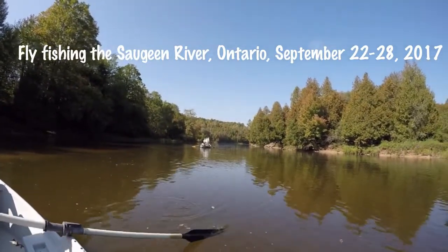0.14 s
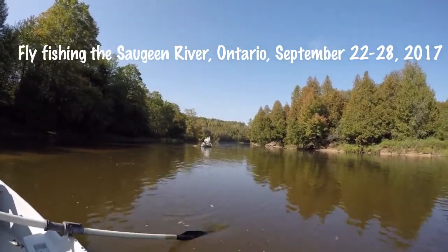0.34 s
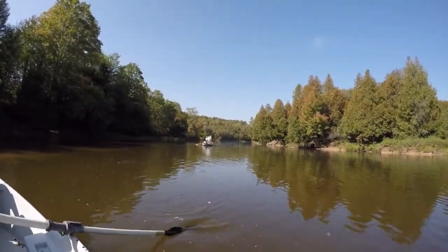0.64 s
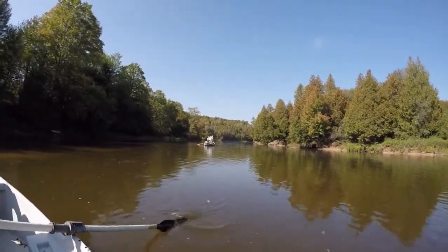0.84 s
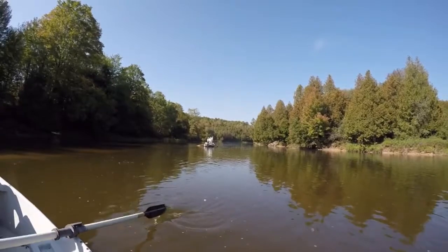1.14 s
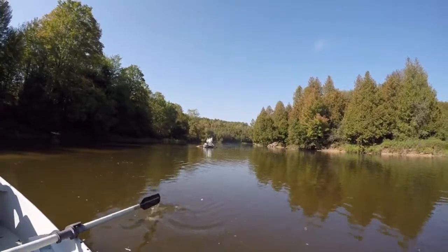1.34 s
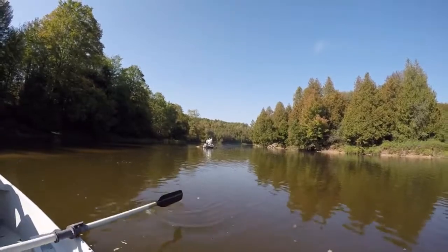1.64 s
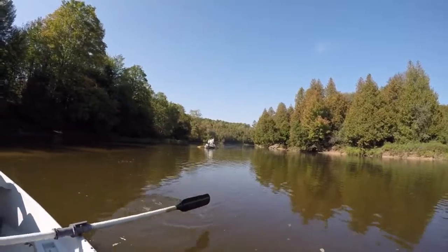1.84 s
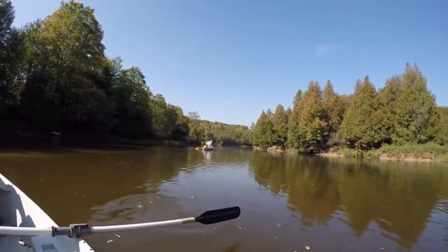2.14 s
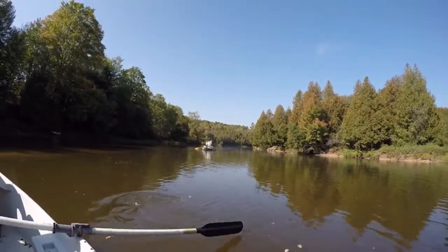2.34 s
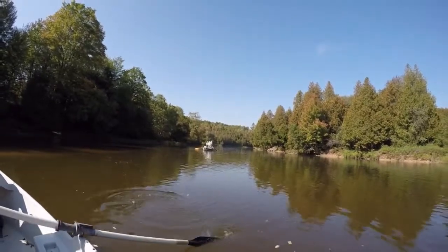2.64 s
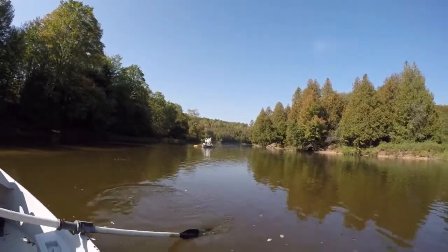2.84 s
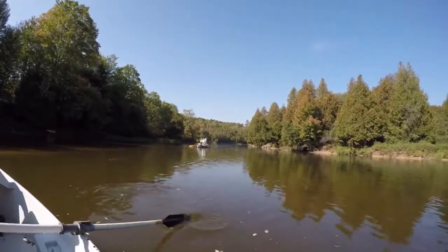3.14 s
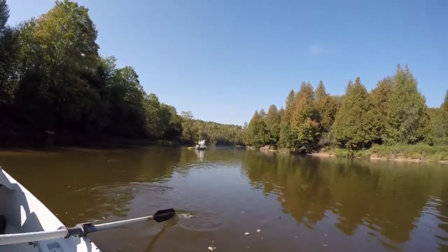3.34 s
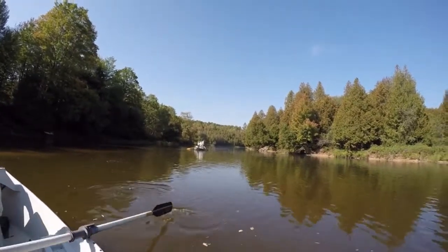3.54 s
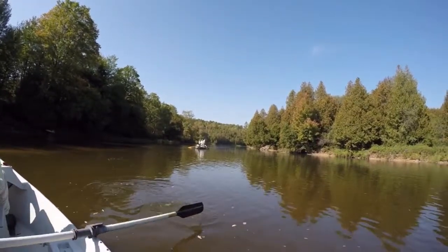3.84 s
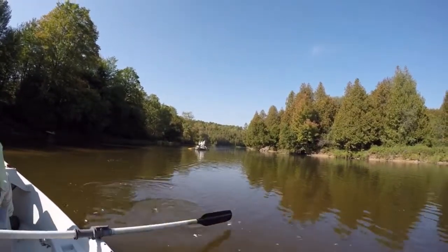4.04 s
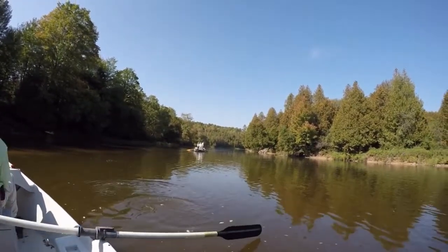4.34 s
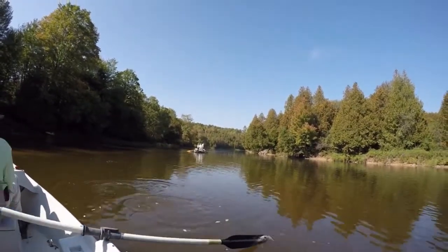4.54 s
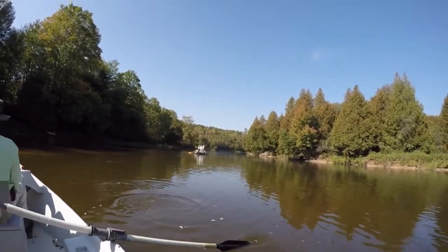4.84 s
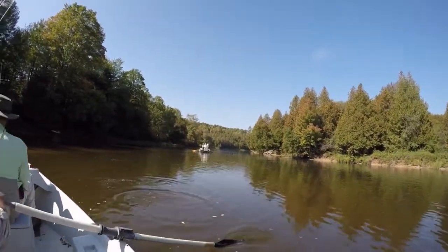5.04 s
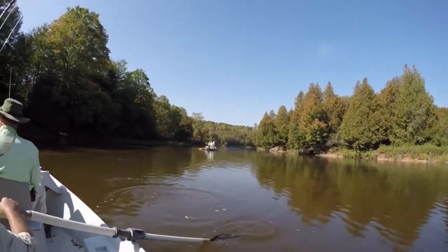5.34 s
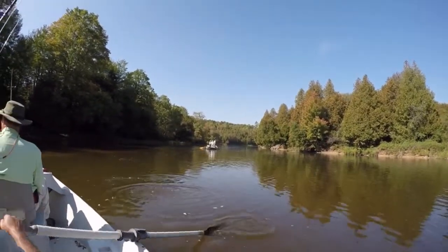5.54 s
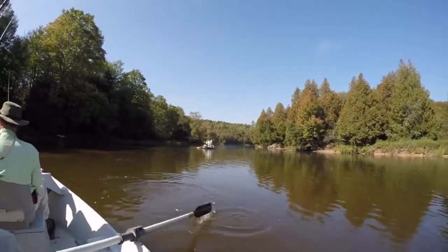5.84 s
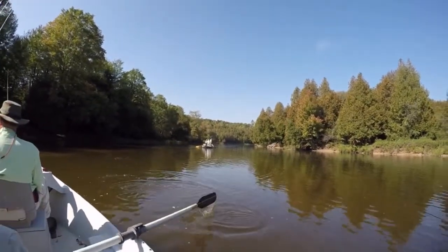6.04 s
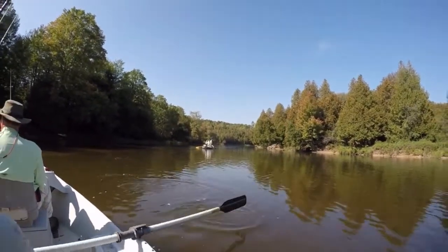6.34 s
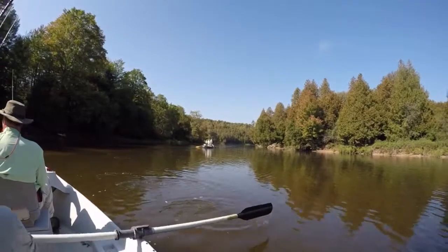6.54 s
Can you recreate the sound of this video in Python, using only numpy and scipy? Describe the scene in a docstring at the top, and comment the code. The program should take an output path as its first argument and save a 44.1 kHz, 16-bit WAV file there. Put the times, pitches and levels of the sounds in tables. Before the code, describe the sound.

Quiet rowing heard from on board: bright oarlock clicks, dripping and gurgling water, soft hull thumps, and a low rumble beneath.

```python
"""Rowing on a calm river

A boat is rowed gently, three strokes and a recovery, heard from on board. Oars click and knock in their
locks, and feet or oar handles thump the hull: each blow rings a set of decaying modes.
Blades stir up bubbles and shed drops, each a sine under a swelling and dying envelope.
A low rumble and a soft hiss, both shaped noise, lie under it all."""
import sys
import numpy as np
from scipy import signal
from scipy.fft import rfft, irfft
from scipy.io import wavfile
from scipy.ndimage import uniform_filter1d

SR = 44100
rng = np.random.default_rng(int(sys.argv[2]) if len(sys.argv) > 2 else 0)


def generate_wav(signal):
    """Clip the signal to [-1, 1] and save it as 16-bit WAV at the path in sys.argv[1]."""
    frames = np.transpose(np.atleast_2d(signal))
    scaled = np.clip(frames, -1, 1) * 32767
    pcm = np.round(scaled).astype(np.int16)
    wavfile.write(sys.argv[1], SR, pcm)


N = 295029  # length in samples


def undb(db):
    """Level law: decibels to amplitude gain."""
    return 10 ** (np.asarray(db) / 20)


def unit(x):
    """Power normalisation: scale to rms 1."""
    return x / np.sqrt(np.mean(x ** 2))


def curve(points):
    """Linear interpolation: (t, value) points joined by straight lines in time."""
    t, value = np.transpose(points)
    return np.interp(np.arange(N) / SR, t, value)


def add(out, s, sound):
    """Superposition: mix a sound in at time s."""
    i = int(np.clip(s * SR, 0, N - 1))
    out[i:i + len(sound)] += sound[:N - i]


def noise(spectrum):
    """Spectral shaping: white noise weighted by (f, level) points, rms 1."""
    hz, db = np.transpose(spectrum)
    f = np.maximum(np.fft.rfftfreq(N, 1 / SR), 1)
    gain = undb(np.interp(np.log(f), np.log(hz), db))
    return unit(irfft(rfft(rng.standard_normal(N)) * gain, N))


def band(hz, width_hz):
    """Resonance: noise concentrated round one frequency, rms 1."""
    f = np.fft.rfftfreq(N, 1 / SR)
    gain = 1 / (1 + (2 * (f - hz) / width_hz) ** 2)
    return unit(irfft(rfft(rng.standard_normal(N)) * gain, N))


def bubble(hz, swell_s, glide):
    """Bubble resonance: an air pocket swells, rings and dies, rising in pitch as it nears the surface."""
    age = np.arange(int(swell_s * SR * 7)) / (swell_s * SR)  # in swell times
    shape = (age * np.exp(1 - age)) ** 1.5  # greatest at age 1
    cycles = hz * swell_s * (age + glide * (age ** 2 / 2 - age))  # passes through hz at age 1
    return shape * np.sin(2 * np.pi * cycles)


def bubbles(pitch, spread, per_s, cycles, scatter_db):
    """Random superposition: many small bubbles scattered round a pitch that may move, rms 1."""
    out, pitch = np.zeros(N), np.broadcast_to(pitch, N)
    for when, up, down, size in rng.random((int(per_s * N / SR), 4)):
        detune = np.exp(spread * np.sqrt(6) * (up - down))  # spread is the standard deviation
        hz = np.clip(pitch[int(when * N)] * detune, 200, 14000)
        add(out, when * N / SR, undb(scatter_db * size) * bubble(hz, cycles / hz, glide=0.034))
    return unit(out)


def blows(table, modes, contact_s, crack, crack_s, crack_hz, detuning):
    """Modal synthesis: each blow rings the modes in its own mix, with a short scuff of contact noise."""
    out, t = np.zeros(N), np.arange(SR // 8) / SR
    hz, db, t60 = np.transpose(modes)[:, :, None]
    dull = signal.butter(4, min(crack_hz, SR * .45), fs=SR, output="sos")
    for s, peak_db, tilt_db in table:
        mix_db, detune, phase = rng.standard_normal((3, len(hz), 1))
        gain = undb(db + tilt_db * np.log2(hz / 1000) + mix_db)
        decay = np.exp(-np.log(1000) * t / t60)
        tone = np.sin(2 * np.pi * hz * (1 + detuning * detune) * t + np.pi * phase)
        ring = np.sum(gain * decay * tone, axis=0)
        scuff = np.exp(-t / crack_s) * unit(signal.sosfilt(dull, rng.standard_normal(len(t))))
        onset = 1 - np.exp(-(t / contact_s) ** 2)
        hit = (ring / np.abs(ring).max() + crack * scuff) * onset
        add(out, s, undb(peak_db) * hit / np.abs(hit).max())
    return out


def rebounding(table, gap_s, fall_db, count):
    """Rebound: the oar has play in its lock, so weaker, unevenly spaced blows follow each one."""
    blows_out = []
    for s, db, tilt in table:
        gaps = gap_s * (.5 + rng.random(count))
        for k in range(count + 1):
            blows_out.append((s + gaps[:k].sum(), db + k * fall_db, tilt))
    return blows_out


# Spectrum of the boom: (f/Hz, relative level/dB)
BOOM_SPECTRUM = [(12, -32), (22, -5), (30, -1), (38, -3.5), (44, 3), (50, 0.5), (56, -2.5), (63, -8),
                 (72, -10), (90, -58), (140, -94)]
# Level of the boom over time: (t/s, level/dB)
BOOM_LEVEL = [(0, -44), (.17, -33.5), (.32, -42.5), (.62, -32.5), (.92, -41), (1.45, -39.5), (2.22, -38.5),
              (2.8, -41), (3.05, -36.5), (4.1, -40.5), (4.32, -34), (4.55, -44), (4.75, -36.5), (5.3, -42),
              (5.62, -36.5), (6.0, -46), (6.08, -36.5), (6.69, -39)]
# Spectrum of the drone: (f/Hz, relative level/dB)
DRONE_SPECTRUM = [(30, -14), (55, -5.5), (70, -0.5), (85, -8), (100, -9), (120, -17.5), (150, -21.5),
                  (200, -28.5), (300, -39), (600, -57.5)]


def rumble(steadiness):
    """Amplitude modulation: a deep boom swells and sinks, under a steady, slightly higher drone."""
    boom = noise(BOOM_SPECTRUM)
    power = uniform_filter1d(uniform_filter1d(boom ** 2, size=SR // 16), size=SR // 24)
    # dividing by part of its own envelope evens out the noise
    even_boom = unit(boom / np.sqrt(power) ** steadiness)
    return even_boom * undb(curve(BOOM_LEVEL)) + undb(-50) * noise(DRONE_SPECTRUM)


# Spectrum of the hiss: (f/Hz, relative level/dB)
HISS_SPECTRUM = [(120, -21), (200, -5), (240, -3), (267, -4), (384, -4.5), (428, -5), (1290, -12.5),
                 (1760, -12), (2260, -11.5), (2660, -12.5), (3370, -14), (4840, -15.5), (5490, -17),
                 (9630, -22), (15100, -25)]


def hiss():
    """Stationary noise: the smooth hiss of the open air, with a faint high resonance."""
    return undb(-64.5) * noise(HISS_SPECTRUM) + undb(-86) * band(9550, width_hz=490)


def surge(s, length_s, attack_s, release_s):
    """Exponential growth and decay: a flow builds up to time s, holds and drains away."""
    t = np.arange(N) / SR
    before, after = np.maximum(s - t, 0), np.maximum(t - s - length_s, 0)
    return np.exp(-before / attack_s - after / release_s)


# Water streams off the blade late in each stroke:
# (t/s, length/s, trickle level/dB, gurgle level/dB, spray level/dB, pitch of most bubbles f/Hz)
STROKES = [(1.018, .35, -71.5, -72.5, -74.5, 2440), (2.979, .5, -69, -72, -72, 2455),
           (5.38, .68, -67, -75.5, -74.5, 1920)]
STROKE_ATTACK_S, STROKE_RELEASE_S = 0.13, 0.17
PULL_LEAD_S, PULL_DB = 0.45, -2  # the pull sprays this long before the stream; level relative to its spray
# A blade cuts into the water or flips out of it: (t/s, length/s, gurgle level/dB, spray level/dB)
SPLASHES = [(0.154, 0.031, -76, -74.5), (1.295, 0.035, -68, -82), (2.50, 0.072, -68, -71),
            (4.633, 0.12, -68.5, -70.5), (5.774, 0.11, -65.5, -71)]
SPLASH_ATTACK_S, SPLASH_RELEASE_S = 0.056, 0.072
LAP_TRICKLE_DB, LAP_GURGLE_DB, LAP_SPRAY_DB = -88, -81.5, -80.5  # constant ripples along the hull


def flows():
    """Power addition: ripples, strokes and splashes combine into trickle, gurgle and spray strengths."""
    trickle, gurgle, spray = undb(LAP_TRICKLE_DB), undb(LAP_GURGLE_DB), undb(LAP_SPRAY_DB)
    for s, length_s, trickle_db, gurgle_db, spray_db, _ in STROKES:
        stream = surge(s, length_s, STROKE_ATTACK_S, STROKE_RELEASE_S)
        pull = surge(s - PULL_LEAD_S, PULL_LEAD_S, STROKE_ATTACK_S, STROKE_RELEASE_S)
        trickle = np.hypot(trickle, undb(trickle_db) * stream)
        gurgle = np.hypot(gurgle, undb(gurgle_db) * stream)
        spray = np.hypot(spray, undb(spray_db) * np.maximum(stream, undb(PULL_DB) * pull))
    for s, length_s, gurgle_db, spray_db in SPLASHES:
        splash = surge(s, length_s, SPLASH_ATTACK_S, SPLASH_RELEASE_S)
        trickle = np.hypot(trickle, undb(gurgle_db - 7) * splash)
        gurgle = np.hypot(gurgle, undb(gurgle_db) * splash)
        spray = np.hypot(spray, undb(spray_db) * splash)
    return trickle, gurgle, spray


# Resonances that colour the water: (f/Hz, bandwidth/Hz, relative level/dB)
WATER_RESONANCES = [(1738, 55, 6.5), (2324, 120, 7.5), (2560, 200, 7.5), (3320, 110, 8), (3855, 110, 2.5),
                    (4240, 56, -0.5), (5420, 250, -2)]


def resonate(x):
    """Parallel resonators: the direct sound plus narrow ringing bands, rms 1."""
    out = x
    for hz, width_hz, db in WATER_RESONANCES:
        b, a = signal.iirpeak(hz, hz / width_hz, fs=SR)
        out = out + undb(db) * signal.lfilter(b, a, x)
    return unit(out)


# Bubble families of the trickle: (multiple of the stroke's pitch, relative spread, relative level/dB)
BUBBLE_FAMILIES = [(1, 0.096, -1.5), (.76, 0.072, -6), (1.3, 0.096, -9), (1.8, 0.11, -10)]


def blades():
    """Bubble swarms: water trickles off the blades, big bubbles gurgle and tiny ones spray and fizz."""
    trickling, gurgling, spraying = flows()
    points = []
    for s, length_s, *_, hz in STROKES:
        points += [(s, hz), (s + length_s, hz)]
    pitch = curve(points)
    trickle = np.zeros(N)
    for multiple, spread, db in BUBBLE_FAMILIES:
        trickle += undb(db) * bubbles(pitch * multiple, spread, per_s=300, cycles=2.75, scatter_db=16)
    gurgle = resonate(bubbles(1258, 0.22, per_s=600, cycles=1.84, scatter_db=22))
    glugs = undb(-9) * bubbles(428, 0.34, per_s=150, cycles=1.1, scatter_db=18)
    spray = resonate(bubbles(4170, 0.15, per_s=650, cycles=2.1, scatter_db=28))
    fizz = undb(-8.5) * bubbles(7300, 0.24, per_s=120, cycles=3.1, scatter_db=30)
    return trickling * resonate(trickle) + gurgling * (gurgle + glugs) + spraying * unit(spray + fizz)


# Oarlock clicks: (t/s, peak level/dB, treble tilt/dB per octave)
CLICKS = [(.157, -54, 12), (.186, -46.5, -6), (.9068, -43, -8), (2.461, -51.5, 10), (2.482, -50, 4),
          (2.587, -44.5, 8), (2.9618, -48.5, 5), (2.9662, -47, -19), (3.116, -49, -5), (4.6265, -45, -16),
          (4.6375, -48, 1), (4.643, -44.5, -2), (4.695, -52, 7), (5.0238, -50.5, 3), (5.0765, -48, -4),
          (5.1045, -45, -2), (6.064, -49, -10), (6.125, -51, -5), (6.271, -55, 20), (6.512, -56, 25)]
# Modes of the oarlock: (f/Hz, relative level/dB, 60 dB decay time/s)
LOCK_MODES = [(1270, -19, 0.0042), (1970, 2.5, 0.0039), (2398, -6.5, 0.039), (2675, -5.5, 0.024),
              (3470, 9.5, 0.0051), (3906, -4.5, 0.028), (4305, -3, 0.019), (5370, -7, 0.013),
              (6230, -12, 0.024), (8300, -11, 0.0038), (8800, -10.5, 0.0067)]


def clicks():
    """Modal ringing of a small stiff body: the oarlocks click brightly and rebound."""
    hits = rebounding(CLICKS, gap_s=0.0048, fall_db=-7.5, count=2)
    return blows(hits, LOCK_MODES, contact_s=0.00058, crack=0.05, crack_s=0.005,
                 crack_hz=8600, detuning=0.0083)


# Largest drops and bubbles: (t/s, pitch f/Hz, peak level/dB, swell time/ms)
DROPS = [(.288, 1430, -54.5, 2.5), (.705, 630, -53, 2.4), (.739, 4160, -54.5, 0.81), (.873, 4060, -53.5, 1),
         (.980, 2320, -48.5, 2.1), (.994, 2530, -50, 2.1), (1.3358, 1290, -43, 0.52),
         (1.528, 2660, -58.5, 1.8), (1.8645, 2620, -56.5, 1.8), (2.3383, 4230, -52, .6),
         (2.514, 2360, -50, 2.8), (2.556, 2400, -52, 1), (2.603, 8400, -49, .54), (2.6125, 4360, -50, 1.2),
         (2.734, 2080, -51.5, 1.3), (2.7837, 3700, -54, 0.71), (3.157, 3700, -49.5, 0.69),
         (3.2542, 2380, -49, 1.6), (3.304, 3600, -52, 1.2), (3.3375, 706, -46, 0.8),
         (3.339, 520, -44.5, 1.2), (3.368, 1980, -49.5, 1.3), (3.388, 2350, -48.5, 1.5),
         (3.4433, 2440, -53, 1), (3.529, 1370, -53, 1.2), (4.6803, 4000, -51, .7),
         (4.716, 1160, -52.5, 2.2), (4.8288, 4800, -50, 0.45), (4.9655, 1710, -53, 1.3),
         (4.992, 3890, -51, .8), (5.025, 1500, -57, 2.6), (5.231, 1880, -51, 1.5),
         (5.275, 1880, -54.5, 2.1), (5.362, 1810, -46, 2.1), (5.3857, 2260, -46.5, 1.6),
         (5.8283, 3850, -47, .75), (5.921, 1440, -52, 2.1), (6.648, 4450, -50.5, 0.81)]


def drops():
    """Bubble entrainment: drops from the blades each trap one ringing bubble."""
    out = np.zeros(N)
    for s, hz, peak_db, swell_ms in DROPS:
        add(out, s, undb(peak_db) * bubble(hz, swell_ms / 1000, glide=0.012))
    return out


# Knocks of the oar shaft against its lock: (t/s, peak level/dB, treble tilt/dB per octave)
KNOCKS = [(.297, -52, 20), (.696, -54, -6), (.710, -52, 2), (1.308, -50, 7), (2.519, -49, 25),
          (2.581, -47.5, 18), (5.6702, -43.5, 0), (5.684, -44, 9), (5.689, -44, -7)]
# Modes of the shaft: (f/Hz, relative level/dB, 60 dB decay time/s)
SHAFT_MODES = [(373, -1, 0.031), (510, -6, 0.03), (634, -1.5, 0.027), (782, -4, 0.047), (990, -8, 0.022),
               (1240, -0.5, 0.011), (1430, -14, 0.014), (1740, -7.5, 0.021), (1940, -10, 0.0098),
               (2150, -16, 0.017), (2480, -29, .012)]


def knocks():
    """Modal ringing of a bar: the oar shafts knock dully against their locks and rebound."""
    hits = rebounding(KNOCKS, gap_s=.008, fall_db=-7, count=2)
    return blows(hits, SHAFT_MODES, contact_s=0.00044, crack=0.14, crack_s=0.017,
                 crack_hz=2300, detuning=0.019)


# Soft thumps of feet or oar handles: (t/s, peak level/dB, treble tilt/dB per octave)
THUMPS = [(.57, -52.5, 9), (1.24, -52, 12), (3.04, -52, -8), (3.336, -46.5, 1.5), (3.854, -43, 4),
          (4.243, -43, 2), (4.303, -53, 5), (4.419, -49, 2), (4.81, -53, -2), (5.675, -47, 7)]
# Modes of the hull: (f/Hz, relative level/dB, 60 dB decay time/s)
HULL_MODES = [(109, 0, 0.16), (141, 9.5, 0.063), (175, -3, 0.06)]


def thumps():
    """Modal ringing of a shell: a soft, slow contact excites the low modes of the hull."""
    return blows(THUMPS, HULL_MODES, contact_s=0.0044, crack=.03, crack_s=.006,
                 crack_hz=190, detuning=0.042)


DRIPS_PER_S, DRIP_DB, DRIP_SWELL_S = 11, -57, 0.0016
DRIP_AFTER_S, DRIP_FADE_DB_PER_S = .35, 12  # drips outlast the stream, shrinking as the blade dries


def drips():
    """Random arrivals: small drips fall while the blade rises, and shrink as it swings back."""
    out = np.zeros(N)
    for s, length_s, *_, hz in STROKES:
        span_s = length_s + DRIP_AFTER_S
        for when, pitch, size in rng.random((int(DRIPS_PER_S * span_s), 3)):
            fade_db = DRIP_FADE_DB_PER_S * max(when * span_s - length_s, 0)
            db = DRIP_DB + 5 * (size - .5) - fade_db
            drip = bubble(hz * (1 + .2 * (pitch - .5)), DRIP_SWELL_S, glide=0.018)
            add(out, s + when * span_s, undb(db) * drip)
    return out


def boat(x, tail_s, wet_db):
    """Diffuse reflection: the open hull scatters each sound back for a few hundredths of a second."""
    t = np.arange(SR // 10) / SR
    echo = rng.standard_normal(len(t)) * np.exp(-t / tail_s) * (t > .003)
    return x + undb(wet_db) * signal.fftconvolve(x, echo / np.linalg.norm(echo))[:N]


def scene():
    """Superposition: oars and water scattered by the boat, over rumble and hiss."""
    background = rumble(steadiness=0.43) + hiss()
    water = blades() + drops() + drips()
    oars = clicks() + knocks() + thumps()
    return (background + boat(water + oars, tail_s=0.006, wet_db=-11))[None]


def record(dry):
    """Band limiting: a steep elliptic low-pass removes the extreme treble."""
    low_pass = signal.ellip(10, .2, 80, 15100, fs=SR, output="sos")  # edge in Hz
    return signal.sosfilt(low_pass, dry)


dry = scene()
out = record(dry)
generate_wav(out)
```